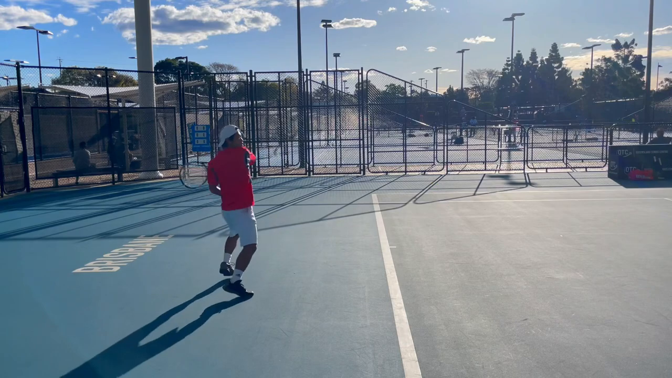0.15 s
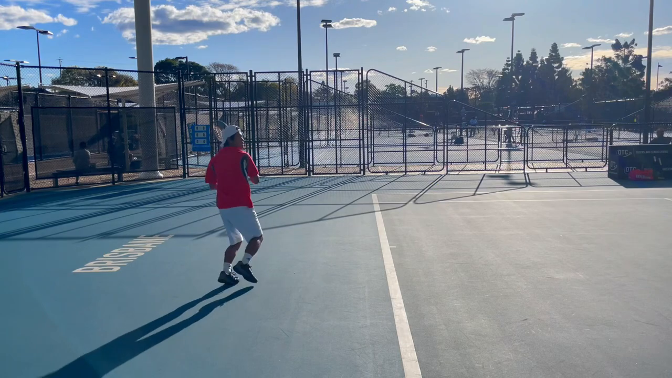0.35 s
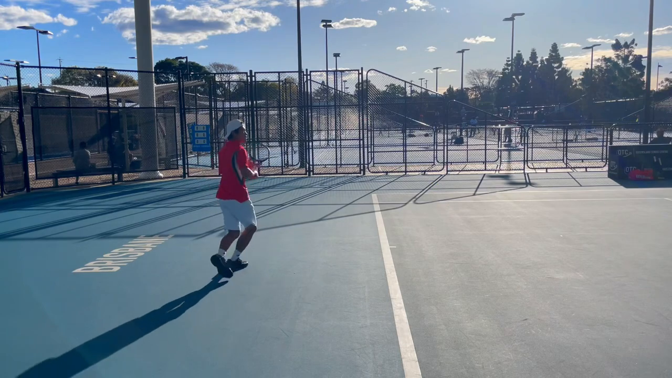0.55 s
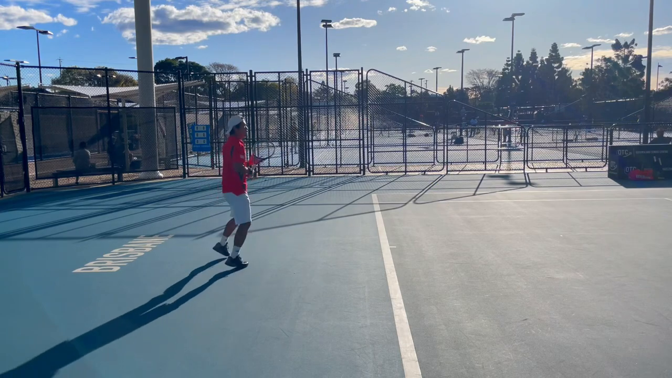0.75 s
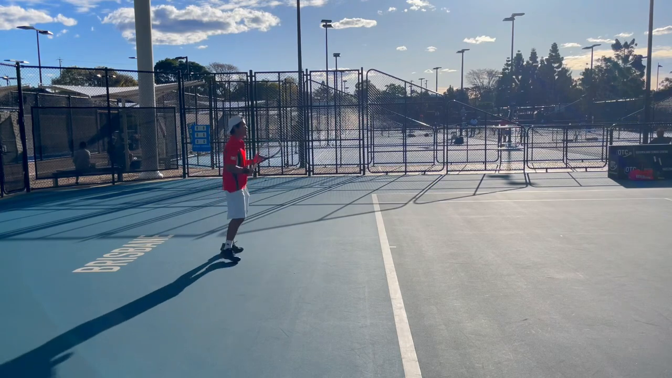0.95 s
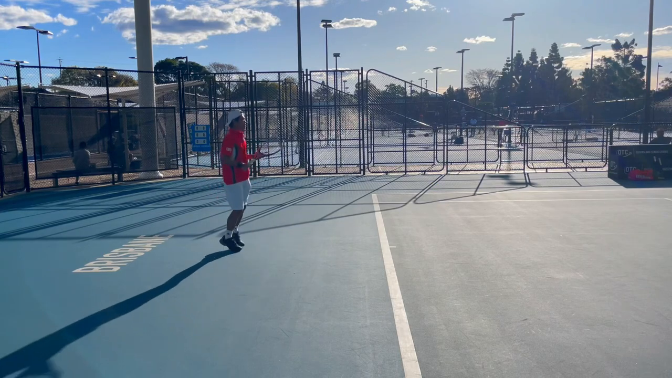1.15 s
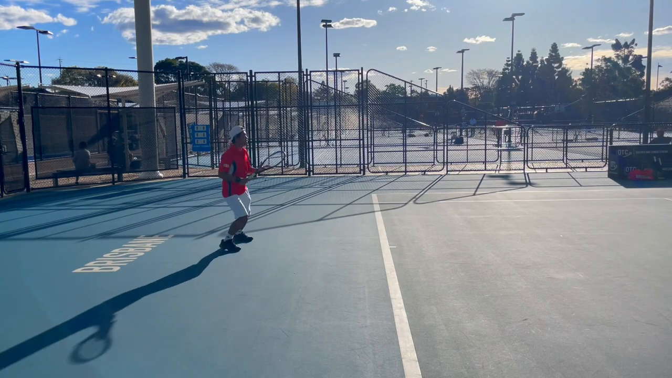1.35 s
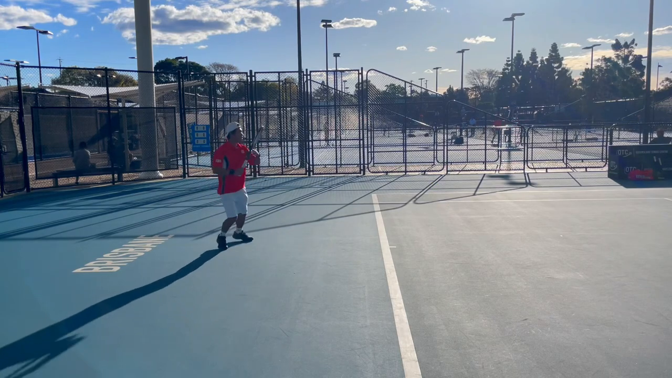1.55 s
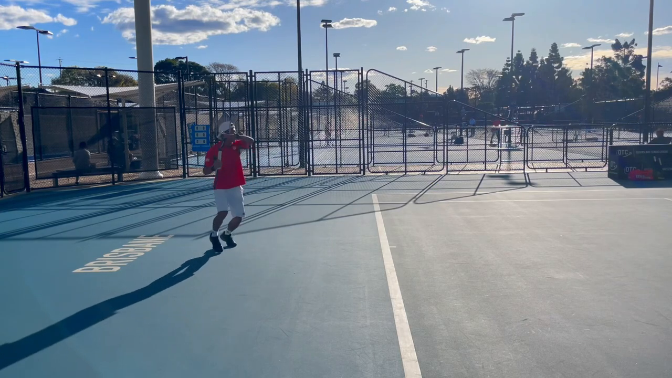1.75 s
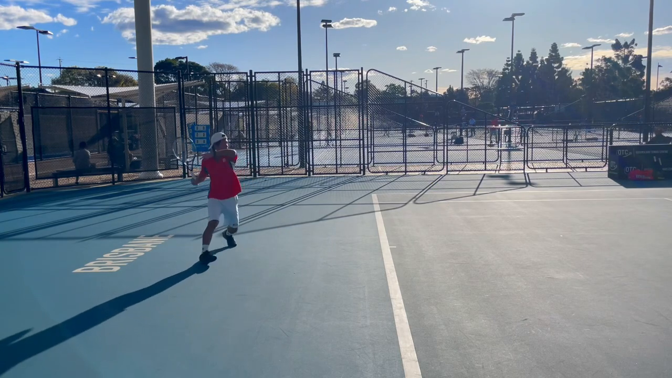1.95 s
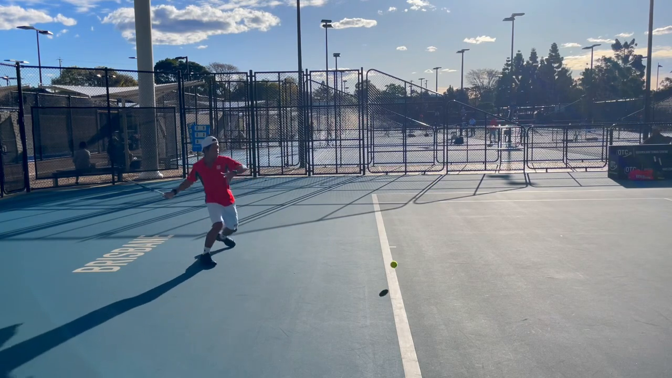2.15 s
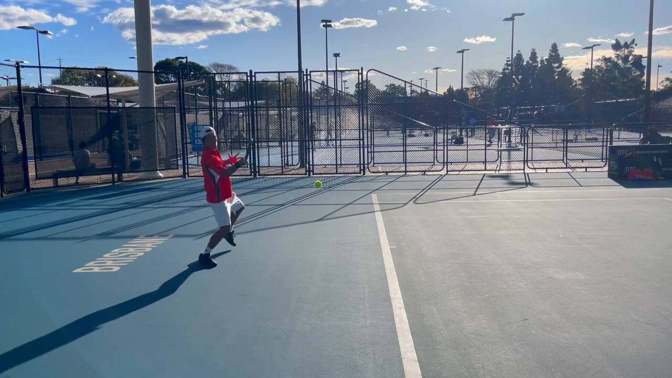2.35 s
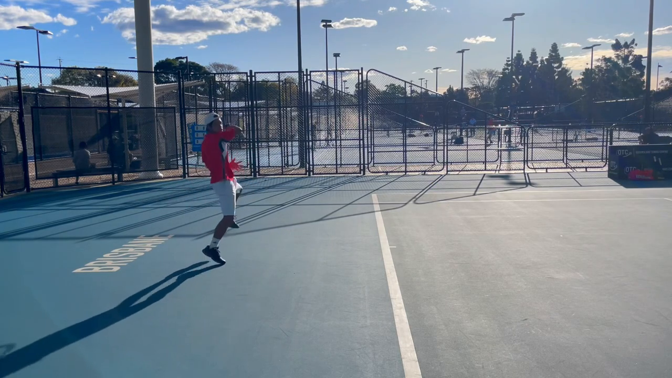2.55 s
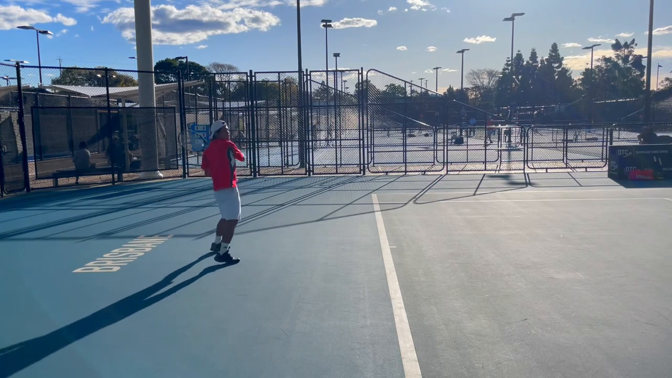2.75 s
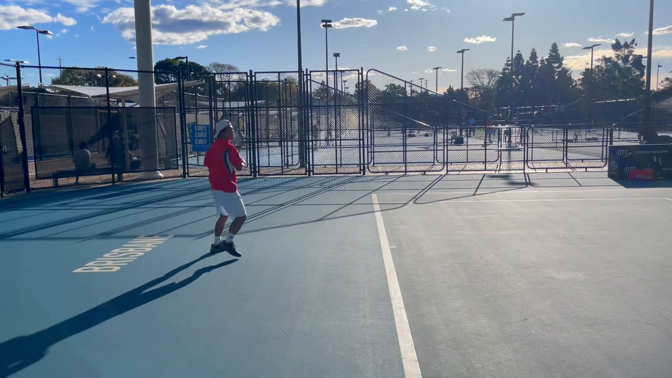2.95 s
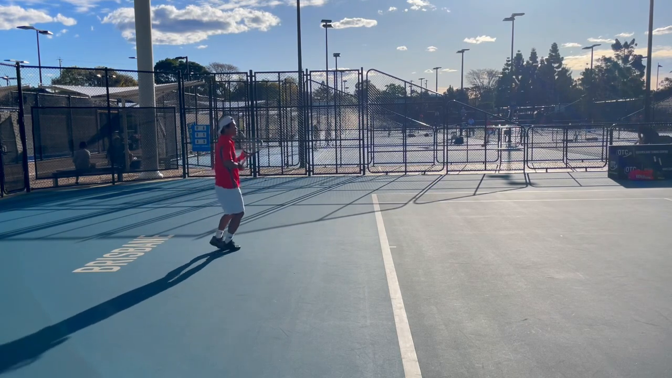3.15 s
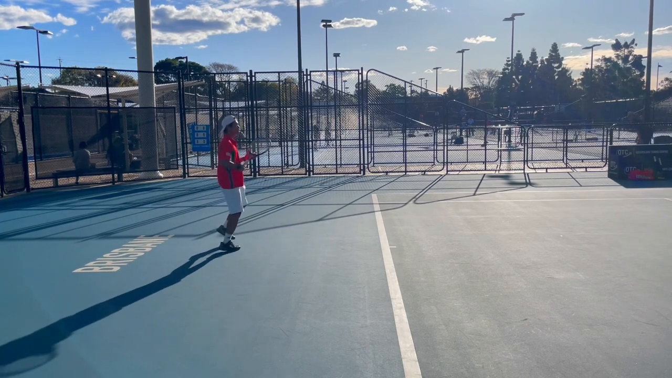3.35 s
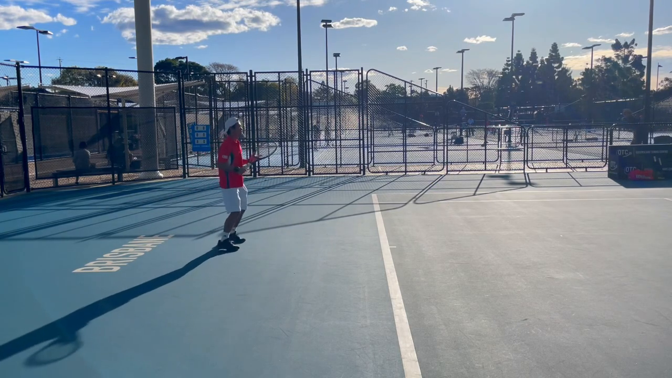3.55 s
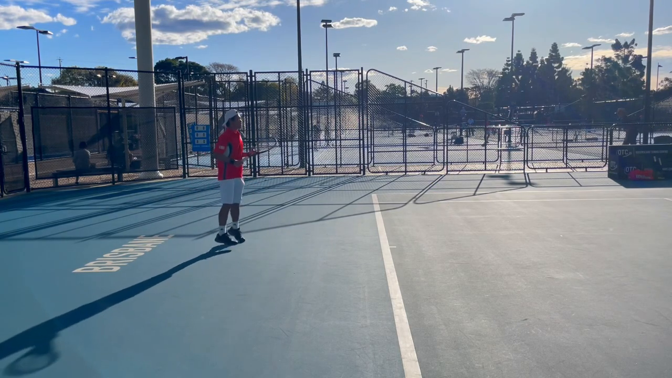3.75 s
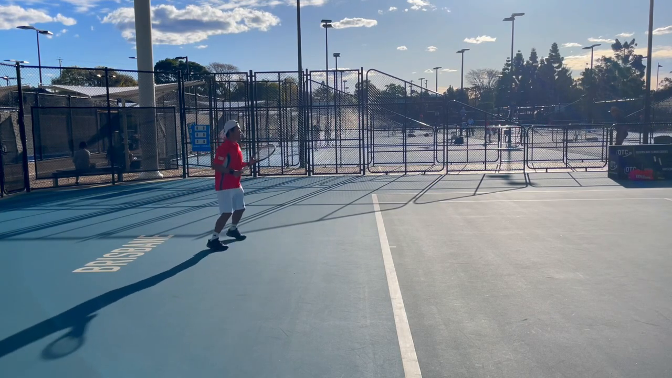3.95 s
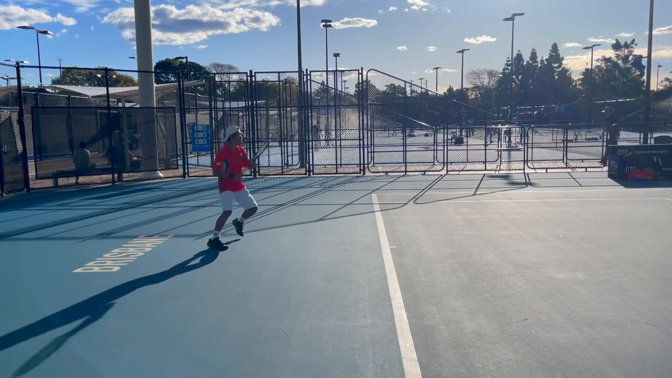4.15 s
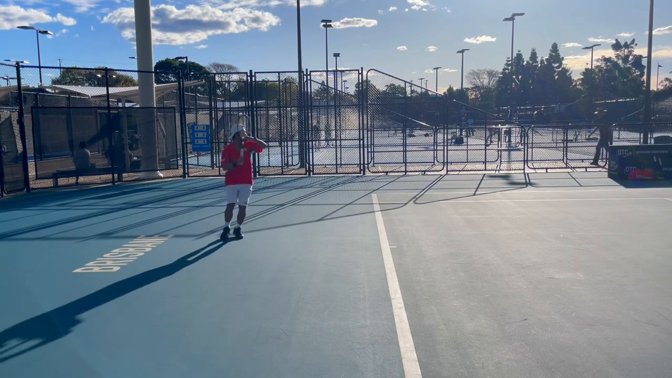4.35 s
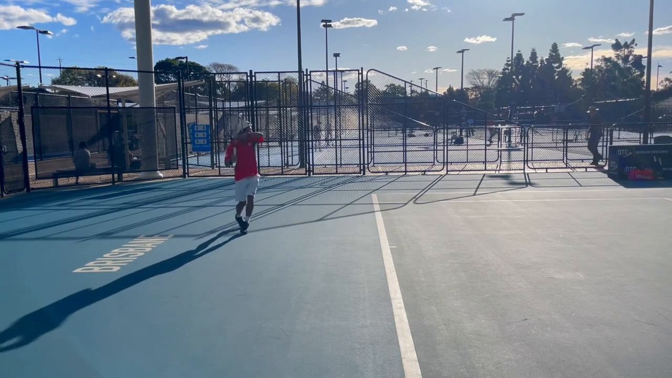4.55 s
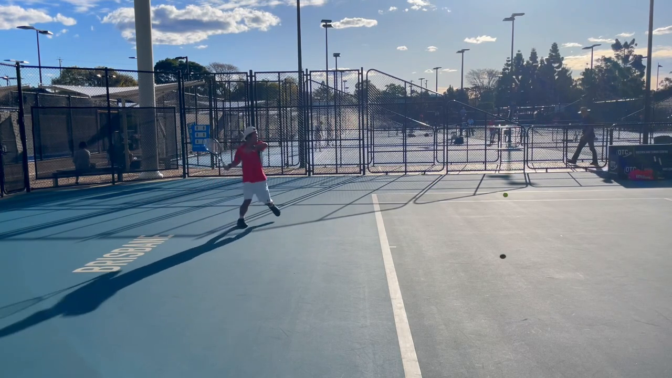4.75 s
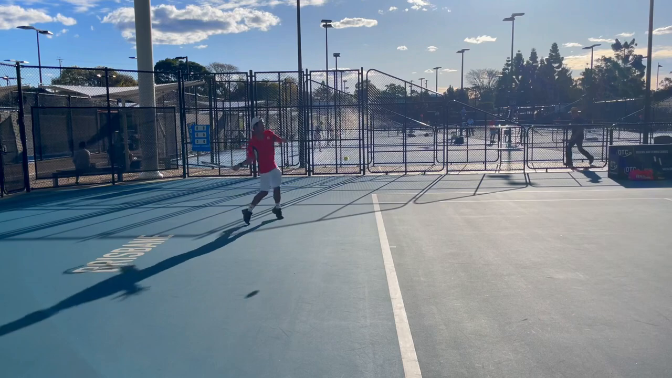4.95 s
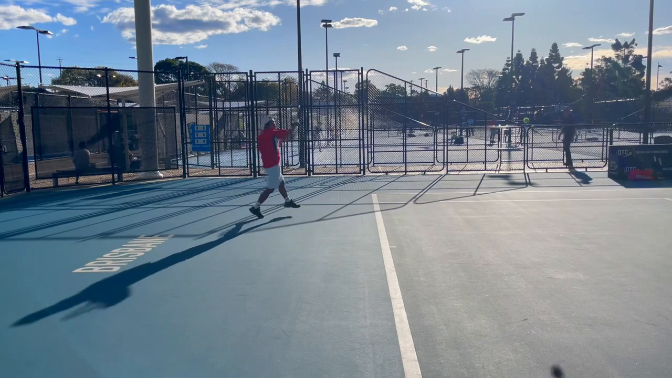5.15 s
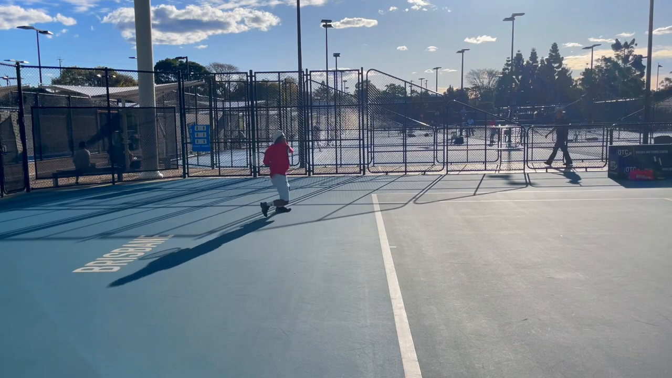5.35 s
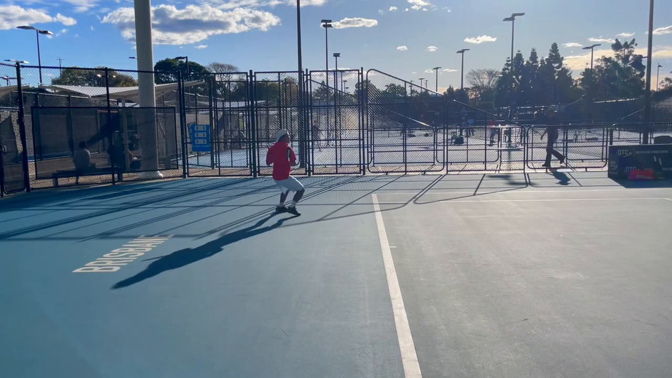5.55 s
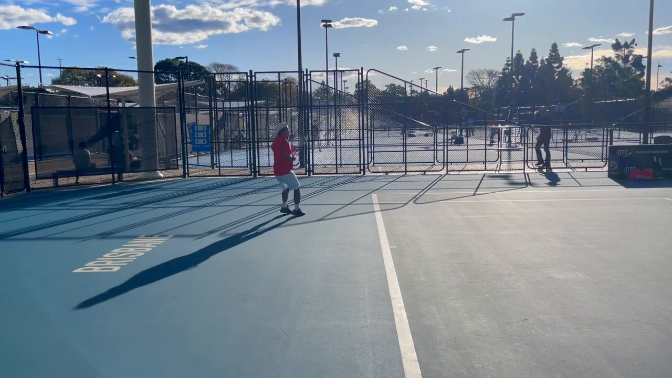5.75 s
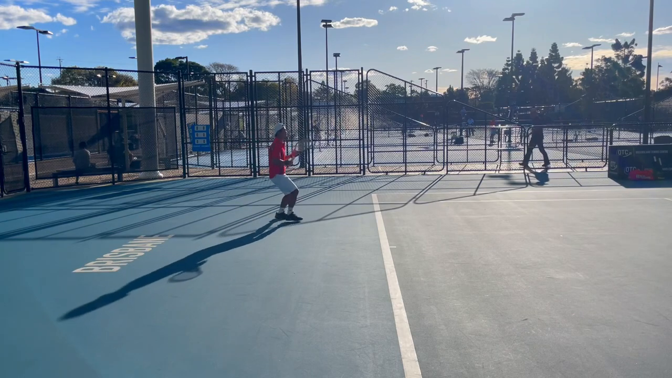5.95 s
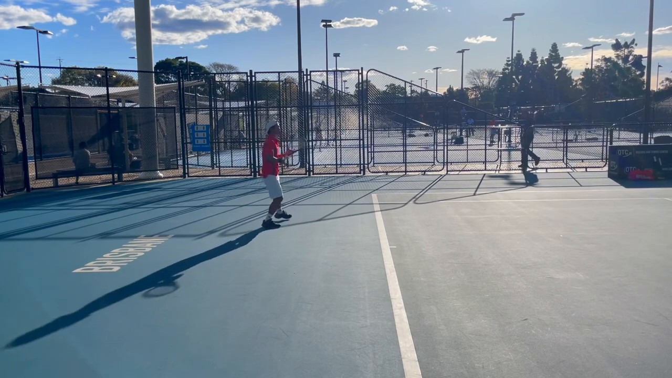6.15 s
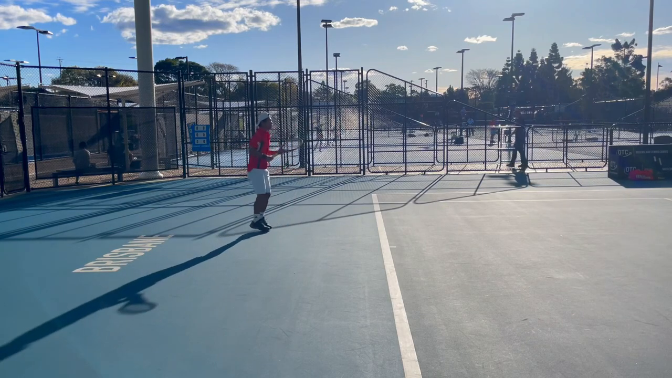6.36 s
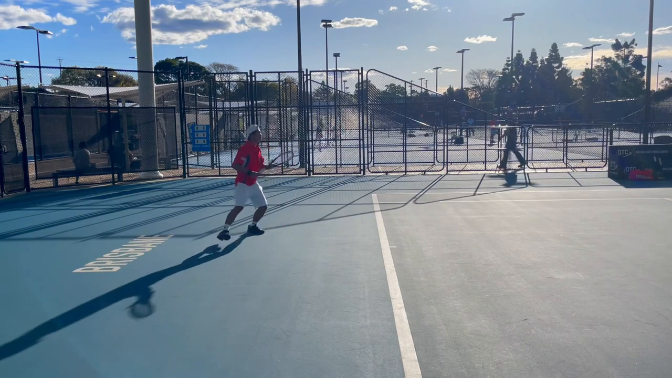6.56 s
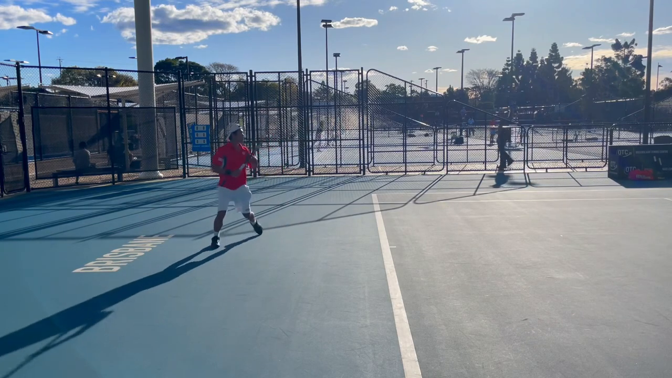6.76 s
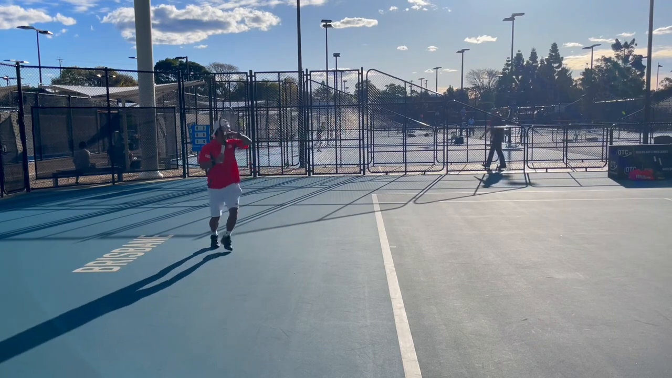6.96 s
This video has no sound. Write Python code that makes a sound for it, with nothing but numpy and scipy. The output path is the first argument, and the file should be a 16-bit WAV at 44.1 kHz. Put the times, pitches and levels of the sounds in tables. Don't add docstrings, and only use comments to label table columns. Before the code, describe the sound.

Racket strings snap and the ball pops close by, alternating with quieter, softened hits from the far end of an open hard court. Light bounces ping before each near stroke, shoes chirp, step and scrape on gritty paint. Fences and walls return distinct echoes and a long tail. Dull traffic rumble and a wavering low hum continue underneath, captured in stereo by a phone.

```python
import sys
import numpy as np
from scipy import signal
from scipy.fft import rfft, irfft, next_fast_len
from scipy.io import wavfile
from scipy.ndimage import uniform_filter1d

SR = 44100
rng = np.random.default_rng(int(sys.argv[2]) if len(sys.argv) > 2 else 0)


def magnitude_from_level(level_db):
    exponent = np.asarray(level_db, float) / 20
    return 10 ** exponent


def dump_mix(stems):
    frames = np.atleast_2d(stems).T
    limited = np.clip(frames, -1, 1)
    pcm = np.round(limited * 32767).astype(np.int16)
    wavfile.write(sys.argv[1], SR, pcm)


N = 309018

# start in seconds, peak in dB, string crack in dB, extra echo lag in seconds,
# share sent to the walls in dB.
NEAR_STROKES = [
    (-.156, -10, -9, .003, 2.5),
    (2.359, -11, -8.5, 0.0053, -0.5),
    (5.0987, -11, -8, 0.0004, 2),
]
FAR_STROKES = [
    (1.1401, -23.5, -9.5, 0.0014, 0.93),
    (3.8007, -23, -10.5, 0.00063, 0.87),
    (6.3554, -25, -10, 0.0014, 1.44),
]
# frequency in Hz, level in dB, T60 in seconds.
NEAR_STROKE_MODES = [
    [(232, -1.5, 0.013), (380, -2, 0.012), (797, 6.5, 0.0062), (1610, -14, 0.01), (2550, -23, 0.0085)],
    [(243, 2.5, 0.012), (573, 7.5, 0.0066), (812, -5.5, 0.026), (964, -9, 0.029), (1230, -13.5, 0.017),
     (1543, -3, 0.007), (2630, -9.5, 0.004)],
    [(207, 1.5, 0.014), (362, -5.5, 0.053), (555, 0.5, 0.011), (797, 5.5, 0.021), (1000, 10.5, 0.0048),
     (1546, 5, 0.0063), (2475, -5.5, 0.0069), (3230, -9, 0.0046)],
]
# frequency in Hz, level in dB, T60 in seconds.
FAR_STROKE_MODES = [(259, -1.5, 0.013), (391, -1, 0.0092), (816, 5.5, 0.006), (1683, -8, 0.0033),
                    (2800, -28.5, 0.016), (3400, -74, 0.0073)]
# start in seconds, peak in dB, ring in Hz,
# late thump in dB, crack in dB.
NEAR_BOUNCES = [
    (2.1657, -24, 1000, -10.5, -17),
    (4.695, -28.5, 1000, -9, -19.5),
]
NEAR_KNOCKS = [
    (1.008, -24, 370, -12, -9),
    (2.211, -42, 1114, -22, -11),
    (2.269, -23, 436.6, -17.5, -24),
    (2.605, -25, 390, -20, -32),
    (4.746, -33, 1056, -9, -19),
    (5.697, -39, 333, -2, -12),
    (6.322, -28.5, 1000, -18, -23),
    (6.762, -30.5, 1060, -12, -22),
]
FAR_KNOCKS = [
    (0.415, -50, 380, -15, -31),
    (3.479, -42, 387, -17, -35),
    (4.336, -37.5, 497, -13, -10),
    (5.606, -41, 360, -26, -9),
    (6.149, -48, 1000, -15, -2),
]
# start in seconds, length in seconds, start pitch in Hz,
# end pitch in Hz, level in dB.
ECHOING_SQUEAKS = [
    (-.03, 0.016, 4640, 4270, -40),
    (0.589, .012, 3860, 3330, -51),
    (0.599, 0.013, 3280, 2870, -48),
    (0.604, 0.013, 3000, 2550, -49),
    (1.141, 0.012, 3310, 2697, -33.5),
    (1.323, 0.027, 3805, 3294, -37),
    (3.833, 0.027, 2310, 2136, -48),
    (4.883, 0.087, 3560, 3367, -51.5),
    (4.937, 0.0072, 2800, 2670, -46.5),
    (5.775, 0.031, 5400, 4960, -51.5),
]
DRY_SQUEAKS = [
    (2.642, 0.013, 3540, 3302, -43),
    (4.384, .012, 3440, 3400, -44.5),
    (4.87, 0.051, 4470, 4220, -51),
    (5.644, 0.016, 3340, 3050, -45.5),
    (5.795, 0.024, 4600, 4050, -56),
    (6.435, 0.02, 2915, 2660, -50),
]
# full pressure time in seconds, hold in seconds, grit in dB,
# duller drag relative to grit in dB.
SLIDES = [(0.0, 0, -58, -6), (0.231, 0.015, -55.5, 4.5), (0.609, 0.024, -60.5, 4),
          (0.932, 0.0017, -56, 0.5), (0.961, .05, -40, -17), (1.073, .005, -60.5, 0),
          (1.133, 0.048, -66, 14.5), (1.309, .005, -59, -1), (1.651, 0.028, -56.5, 3),
          (1.743, 0.035, -69, 4), (1.992, 0.17, -73, 3), (2.238, 0.057, -62, 7.5), (2.345, 0.015, -47, -2),
          (2.401, 0, -49, 7), (2.658, 0.03, -55, 0.5), (3.507, 0.012, -68, 6), (3.942, 0.016, -61, 10),
          (4.114, 0.016, -66.5, 12), (4.387, 0.029, -61.5, 4.5), (4.632, 0.0011, -59, -20),
          (4.959, 0.047, -46.5, -6.5), (5.127, 0.0097, -44.5, 4), (5.202, .03, -75, -7),
          (5.648, 0.02, -59, 8.5), (5.93, 0.028, -68, -21), (6.131, 0, -52.5, 5.5), (6.25, 0.067, -67, 5.5),
          (6.383, 0, -57.5, 9), (6.467, 0.073, -72, 16), (6.82, 0.06, -51, -19)]
# start in seconds, peak in dB, duller part in dB, T60 in seconds.
LANDINGS = [(0.2297, -78, -11, 0.18), (0.5447, -44, -16, 0.035), (0.863, -54, -18.5, 0.17),
            (1.069, -110, 40.5, 0.14), (1.3025, -58.5, -0.5, 0.17), (1.55, -46, -21, 0.065),
            (1.9427, -46, -19, 0.058), (2.6439, -51, -29, 0.044), (3.1456, -57.5, -13.5, 0.058),
            (3.5054, -53, -24, 0.034), (3.675, -61, -18, 0.058), (3.7494, -50.5, -14.5, 0.08),
            (4.2348, -62, -44, 0.024), (4.345, -39.5, -19, 0.037), (4.6229, -74, -27, 0.042),
            (5.2883, -51, -12, 0.13), (5.6171, -51, -29, 0.11), (5.914, -59, -12, 0.058),
            (6.105, -45, -13, 0.059), (6.46, -48, -19, 0.046), (6.811, -49, -15, 0.052)]
# delay in seconds, level in dB, smear in seconds,
# left minus right in dB, phase lead of left in radians.
NEAR_PATHS = [(0, 0, 0, 1, -1.5), (0.02, -40, .006, -1, -21), (.033, -8.5, 0.0055, 2, 1.05),
              (.048, -10, 0.012, 7, -3.3), (.089, -14.5, .014, 5, 1.4), (0.175, -37, 0.0014, 1, 15),
              (0.368, -14, 0.016, -1, 1.4), (0.43, -18, 0.0069, 1, 1.9), (0.519, -22, 0.021, -5, 3.5),
              (0.602, -33, 0.058, 31, 1)]
FAR_PATHS = [(0, 0, 0.015, 17.5, -1.5), (.026, 5, 0.0087, -3.5, -3), (0.074, -7.5, 0.013, 6, 13),
             (0.108, -3.5, 0.0097, 0, 1.5), (.153, 4.5, 0.018, 8, -11.5), (.212, -0.5, 0.019, 1, -2.5)]
# frequency in Hz, gain in dB.
ECHO_COLOUR_DB = [(100, 0.5), (220, -4.5), (380, 3), (700, -1.5), (1000, 2.5), (1600, 7), (3000, 10.5),
                  (6000, 0.5), (9000, 12), (14000, -27.5)]
# frequency in Hz, T60 in seconds.
TAIL_T60_S = [(150, 2.25), (500, 2.7), (1500, 3.57), (4000, 2.88), (12000, 2.64)]
# frequency in Hz, density in dB per Hz.
TRAFFIC_DB_PER_HZ = [(15, -39), (25, 2.5), (59, -4), (108, -2), (195, -7), (223, -6), (489, -14),
                     (545, -13.5), (1160, -23), (1370, -31), (2110, -43.5), (7110, -113), (8590, -44),
                     (10400, -84), (16000, -93)]
# frequency in Hz, share from 0 to 1.
LIKENESS = [(60, 0.98), (130, 0.86), (290, 0.62), (640, 0.13), (1400, 0.17), (3100, 0.11), (7000, 0)]
# time in seconds, level in dB.
HUM_DB = [(0, -47.5), (4.3, -44.5), (4.7, -39.5), (5.9, -44), (6.26, -36.5), (7, -43)]
# frequency in Hz, left minus right in dB.
BALANCE_DB = [(60, 2), (200, 2.5), (700, 2), (2400, 3), (4400, 5.5), (7500, 1), (10000, 0)]
# frequency in Hz, lead of left in radians.
PORT_PHASE_RAD = [(300, 0), (2600, 1.1), (6200, 1.2), (7800, 3.14), (9500, 3.14), (11500, 6.28)]
# frequency in Hz, share from 0 to 1.
SHARED_TOP = [(5500, 0), (7600, .9), (9500, .9), (11500, .7)]

LEAD = SR
SIZE = next_fast_len(N + 3 * SR)
HZ = np.arange(SIZE // 2 + 1) * SR / SIZE + 1e-3
T = np.arange(4096) / SR
ECHO_SIZE = 2 ** 17
GROUND_S, GROUND_DB = .0038, -1.5
BOUNCE_LAG_S, KNOCK_LAG_S = .012, .001
SQUEAK_SEND_DB, DRY_SEND_DB = -10, -18.5
SQUEAK_WAVER_HZ, DRY_WAVER_HZ = 480, 1100
GLIDE_S = 0.0047
PRESS_DB_PER_S, LIFT_DB_PER_S = 639, 338
SETTLE_DB, SETTLE_DB_PER_S = -24, 114
SHUFFLE_DB, SHUFFLE_DRAG_DB = -78.5, 0
NEAR_TAIL_DB, FAR_TAIL_DB = -7.5, 7.5
SLAP_DULL_HZ_S = 450
AIR_HZ = 7560
GRAZE_HZ, GRAZE_DEPTH, GRAZE_OCTAVES = 1000, .75, .7
TRAFFIC_DB, PASS_S, PASS_HALF_WIDTH_S, PASS_RISE_DB = -39.5, 5.51, .3, 4.5
LOW_CUT_HZ, TOP_HZ = 43, 15500


def stroke(track, s, db, crack_db, lag_s, send_db, modes):
    snap = magnitude_from_level(db + crack_db + 4) * crack(.022, 1300, 9500)
    add(track, s, snap, lag_s, send_db - 3)
    add(track, s + .0012, magnitude_from_level(db + 6) * ring(modes, .0012), lag_s, send_db)
    add(track, s + .0012 + GROUND_S, magnitude_from_level(db + 6 + GROUND_DB) * ring(modes, .001), lag_s, -60)


def ring(modes, rise_s):
    y = 0
    for k, (hz, db, t60_s) in enumerate(modes):
        decay = magnitude_from_level(-60 * T / max(t60_s, .003))
        y = y + (-1) ** k * magnitude_from_level(db) * np.sin(2 * np.pi * hz * T) * decay
    y = y * (1 - np.exp(-T / max(rise_s, 1e-4)))
    return y / np.max(np.abs(y))


def crack(t60_s, lo_hz, hi_hz):
    burst = even(rng.standard_normal(len(T)) * magnitude_from_level(-60 * T / t60_s), size=15)
    y = band(burst, lo_hz, hi_hz) * magnitude_from_level(-20 * T / t60_s)
    return y / np.max(np.abs(y))


def knock(track, s, db, hz, thump_db, crack_db, lag_s):
    ping = ring([(hz, 0, .016), (1.53 * hz, -5, .01), (2.86 * hz, -10, .006)], 0.000075)
    add(track, s, magnitude_from_level(db + 1.5) * ping, lag_s)
    thump = ring([(191.4, 0, 0.01)], 0.0025)
    add(track, s + 0.0026, magnitude_from_level(db + thump_db + 16) * thump, lag_s)
    add(track, s, magnitude_from_level(db + crack_db + 6) * crack(.014, 2000, 14000), lag_s)


def squeak(track, s, length_s, from_hz, to_hz, db, send_db, waver_hz):
    u = np.linspace(0, 1, min(int(length_s * SR), len(T)))
    waver = uniform_filter1d(rng.standard_normal((2, len(T))), size=60)[:, :len(u)]
    glide = (from_hz - to_hz) * np.exp(-u * length_s / GLIDE_S)
    hz = to_hz + glide + waver_hz * waver[0]
    level = magnitude_from_level(db + 20 * waver[1]) * np.sin(np.pi * u ** .6) ** .5
    add(track, s, level * np.sin(2 * np.pi * np.cumsum(hz) / SR), send_db=send_db)


def soles():
    grit, drag = slides()
    bright, dull = np.zeros((2, 2, SIZE))
    for s, db, dull_db, t60_s in LANDINGS:
        decay_db = -60 * T / max(t60_s, .01)
        add(bright, s, magnitude_from_level(db - 1.0 + decay_db))
        add(dull, s, magnitude_from_level(db + dull_db + 16 + decay_db))
    grains = rng.standard_normal((3, N)) * magnitude_from_level(2.33 * np.minimum(rng.exponential(size=N), 6))
    grains = grains[0] + 5.4 * grains[1:]
    high = band(band(grains, 9500, 15500), 10500, 14800) * (grit + bright[0, LEAD:LEAD + N])
    low = band(grains, 3000, 8500) * (drag + dull[0, LEAD:LEAD + N])
    return high + low


def slides():
    t = np.arange(0, N, 32) / SR
    out = magnitude_from_level(SHUFFLE_DB + np.array([[0], [SHUFFLE_DRAG_DB]]))
    for s, hold_s, db, drag_db in SLIDES:
        before = np.clip(s - t, 0, None)
        after = np.clip(t - s - max(hold_s, 0), 0, None)
        press = magnitude_from_level(-PRESS_DB_PER_S * before)
        release = magnitude_from_level(-LIFT_DB_PER_S * after) + magnitude_from_level(SETTLE_DB - SETTLE_DB_PER_S * after)
        out = out + press * release * magnitude_from_level(np.array([[db], [db + drag_db]]))
    return np.repeat(out, 32, axis=1)[:, :N]


def court(track, paths, tail_db, graze=0):
    echoes = slaps(paths[1:]) + tail(tail_db)
    direct, sent = rfft(track)
    direct = direct * (1 - graze * np.exp(-(np.log2(HZ / GRAZE_HZ) / GRAZE_OCTAVES) ** 2))
    walls = rfft(echoes, SIZE) * magnitude_from_level(spectrum(ECHO_COLOUR_DB))
    return direct * pair(*paths[0][3:], HZ) + sent * walls


def slaps(paths):
    hz = np.arange(len(T) + 1) * SR / (2 * len(T)) + 1e-3
    like = np.clip(1.05 - hz / 8000, .5, 1)
    echoes = np.zeros((2, ECHO_SIZE))
    for delay_s, db, smear_s, pan_db, lead_rad in paths:
        u = T / max(smear_s, .002)
        puff = rng.standard_normal((3, len(T))) ** 3 * (1 - np.exp(-12 * u)) * np.exp(-u ** 2)
        puff = np.roll(np.pad(puff, ((0, 0), (0, len(T)))), 441, axis=1)
        shared, *own = rfft(even(puff, size=13))
        stereo = np.sqrt(like) * shared + np.sqrt(1 - like) * np.array(own)
        dulling = np.sqrt(1 + (hz * delay_s / SLAP_DULL_HZ_S) ** 3)
        slap = irfft(stereo * pair(pan_db, lead_rad, hz) / dulling)
        i = int(delay_s * SR) - 441
        echoes[:, i:i + slap.shape[1]] += magnitude_from_level(db) * slap
    return echoes


def tail(tail_db):
    t, air, out = np.arange(ECHO_SIZE) / SR, rng.standard_normal((3, ECHO_SIZE)), 0
    for hz in 125 * 2. ** np.arange(8):
        noise = diffuse(air, hz)
        fade_db = tail_db - 60 * t / spectrum(TAIL_T60_S, hz) + 1.59 * walk(45.04, ECHO_SIZE)
        fade = magnitude_from_level(fade_db) * (1 - np.exp(-t / 0.015))
        out = out + band(noise, hz / 2 ** .5, hz * 2 ** .5) * fade * np.sqrt(hz / 1600 / SR)
    return out


def pair(pan_db, lead_rad, hz):
    steer = hz / (hz + 220) / (1 + (hz / 2200) ** 4)
    side = np.array([[.5], [-.5]])
    return np.exp(side * steer * (pan_db * np.log(10) / 20 + 1j * lead_rad))


def town():
    hum_db, = curve(HUM_DB)
    offset = (np.arange(N) / SR - PASS_S) / PASS_HALF_WIDTH_S
    traffic_db = TRAFFIC_DB + PASS_RISE_DB * np.exp(-offset ** 2)
    traffic, swell, air = 0, walk(2.11, N), rng.standard_normal((3, N))
    for hz in 30 * 2 ** np.arange(0, 9.1, .5):
        noise = diffuse(air, hz)
        db = spectrum(TRAFFIC_DB_PER_HZ, hz) + 10 * np.log10(hz) + 0.37 * swell + 0.43 * walk(5.8, N)
        traffic = traffic + magnitude_from_level(db) * band(noise, hz / 1.46, hz * 1.128)
    traffic = traffic / np.std(traffic) * magnitude_from_level(traffic_db)
    hum = np.sin(2 * np.pi * np.cumsum(57 + 4 * walk(9, N)) / SR) * magnitude_from_level(hum_db + 2.5 * walk(16, N))
    hum_side = 0.15 * np.roll(hum, 180) * np.array([[1], [-1]])
    return traffic + hum + hum_side


def diffuse(air, hz):
    alike = np.clip(spectrum(LIKENESS, hz), 0, 1)
    return np.sqrt(alike) * air[0] + np.sqrt(1 - alike) * air[1:]


def spectrum(points, hz=HZ):
    f, v = np.transpose(points)
    return np.interp(np.log(hz), np.log(f), v)


def band(x, lo_hz, hi_hz):
    sos = signal.butter(2, [lo_hz, min(hi_hz, .45 * SR)], "band", fs=SR, output="sos")
    y = signal.sosfilt(sos, x)
    return y / np.std(y)


def even(x, size):
    s = rfft(x)
    y = irfft(s / np.sqrt(uniform_filter1d(np.abs(s) ** 2, size=size)), x.shape[-1])
    return y / np.sqrt(np.sum(y ** 2, axis=-1, keepdims=True))


def walk(rate_hz, size):
    k = int(SR / rate_hz)
    held = np.repeat(rng.standard_normal(size // k + 1), k)
    return 1.4 * uniform_filter1d(uniform_filter1d(held, k), k)[:size]


def curve(table):
    s, *columns = np.transpose(table)
    return [np.interp(np.arange(N) / SR, s, c) for c in columns]


def add(track, s, sound, lag_s=0, send_db=0):
    i, j = int(s * SR) + LEAD, int((s + lag_s) * SR) + LEAD
    track[0, i:i + len(sound)] += sound
    track[1, j:j + len(sound)] += sound * magnitude_from_level(send_db)


def scene():
    near, far = np.zeros((2, 2, SIZE))
    for row, modes in zip(NEAR_STROKES, NEAR_STROKE_MODES):
        stroke(near, *row, modes)
    for row in FAR_STROKES:
        stroke(far, *row, FAR_STROKE_MODES)
    for row in NEAR_KNOCKS:
        knock(near, *row, KNOCK_LAG_S)
    for row in NEAR_BOUNCES:
        knock(near, *row, BOUNCE_LAG_S)
    for row in FAR_KNOCKS:
        knock(far, *row, KNOCK_LAG_S)
    for row in ECHOING_SQUEAKS:
        squeak(far, *row, SQUEAK_SEND_DB, SQUEAK_WAVER_HZ)
    for row in DRY_SQUEAKS:
        squeak(far, *row, DRY_SEND_DB, DRY_WAVER_HZ)
    near_heard = court(near, NEAR_PATHS, NEAR_TAIL_DB)
    far_heard = court(far, FAR_PATHS, FAR_TAIL_DB, GRAZE_DEPTH) / np.sqrt(1 + (HZ / AIR_HZ) ** 4)
    players = irfft(near_heard + far_heard, SIZE)[:, LEAD:LEAD + N]
    return players + soles() + town()


def low_pass(x):
    return signal.sosfilt(signal.butter(12, 15900, fs=SR, output="sos"), x)


def record(dry):
    side = np.array([[.5], [-.5]])
    both, share = rfft(dry, SIZE), spectrum(SHARED_TOP)
    both = both * (1 - share) + share * both.mean(axis=0)
    ports = magnitude_from_level(side * spectrum(BALANCE_DB)) * np.exp(1j * side * spectrum(PORT_PHASE_RAD))
    cuts = 1 / np.sqrt(1 + (LOW_CUT_HZ / HZ) ** 12) / (1 + (HZ / TOP_HZ) ** 40)
    mix = irfft(both * ports * cuts, SIZE)[:, :N]
    return low_pass(mix)


dry = scene()
out = record(dry)
dump_mix(out)
```